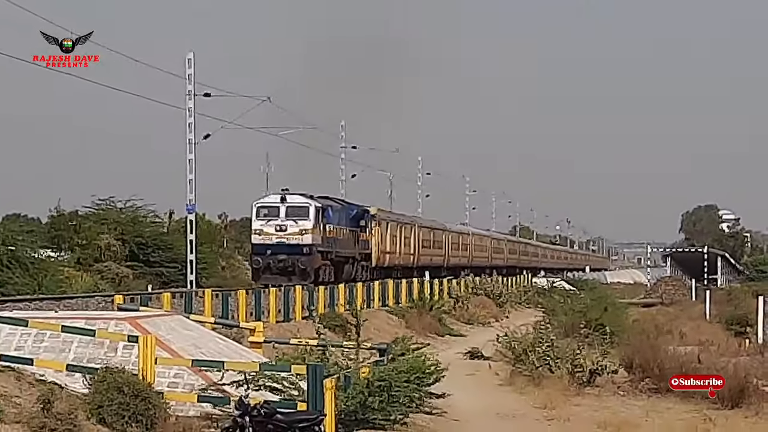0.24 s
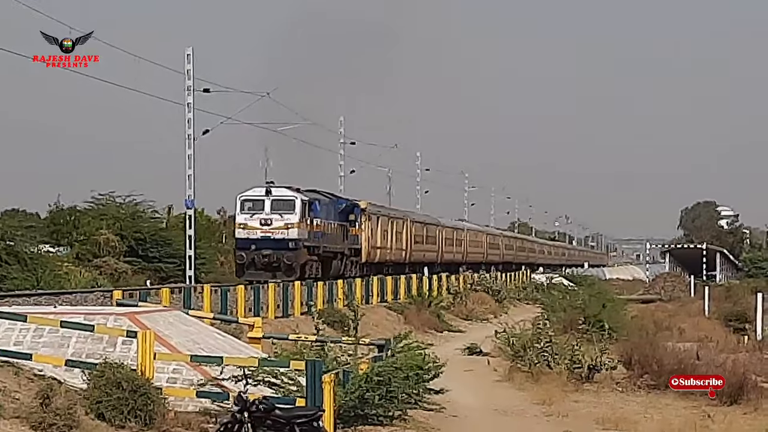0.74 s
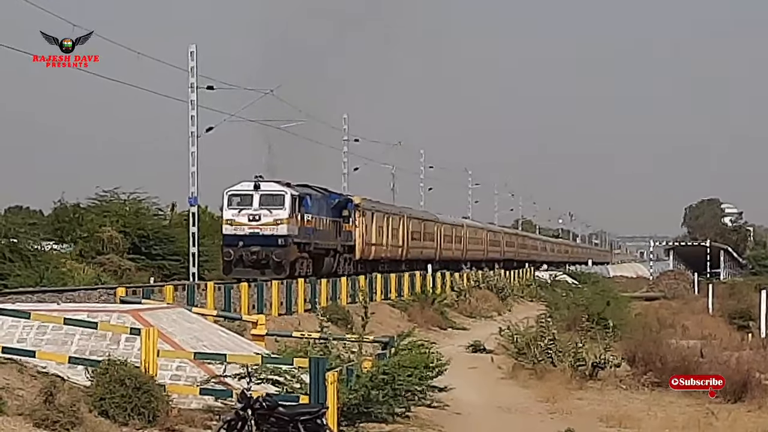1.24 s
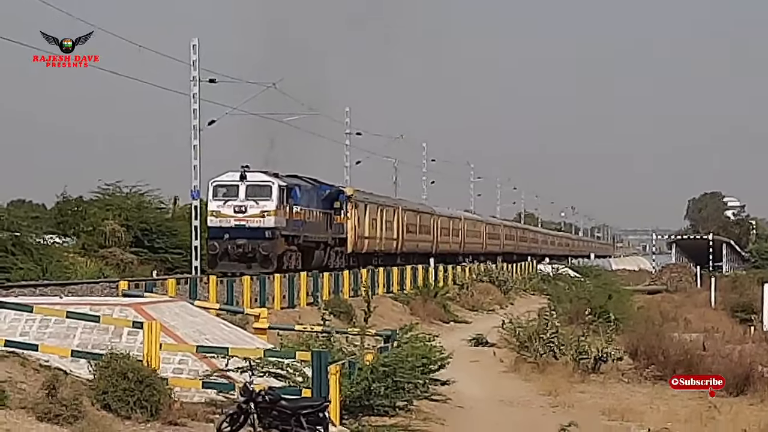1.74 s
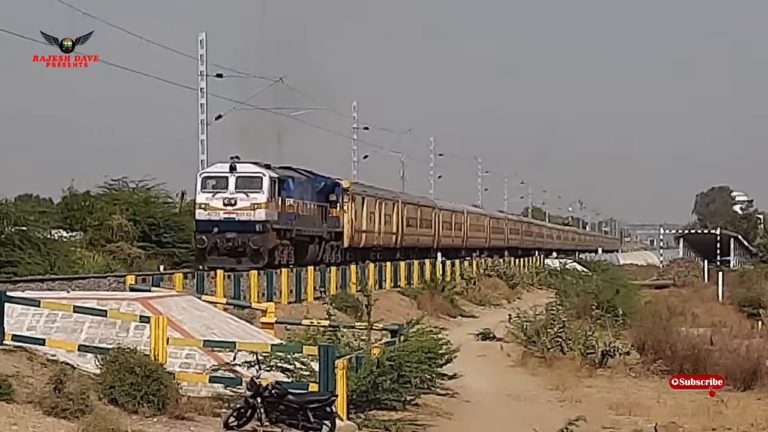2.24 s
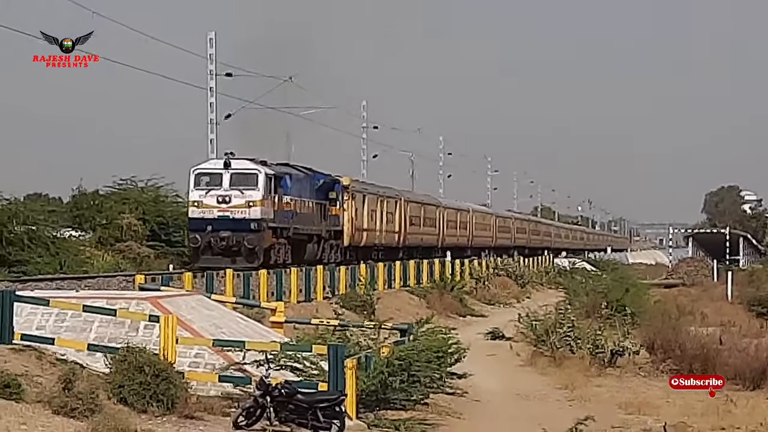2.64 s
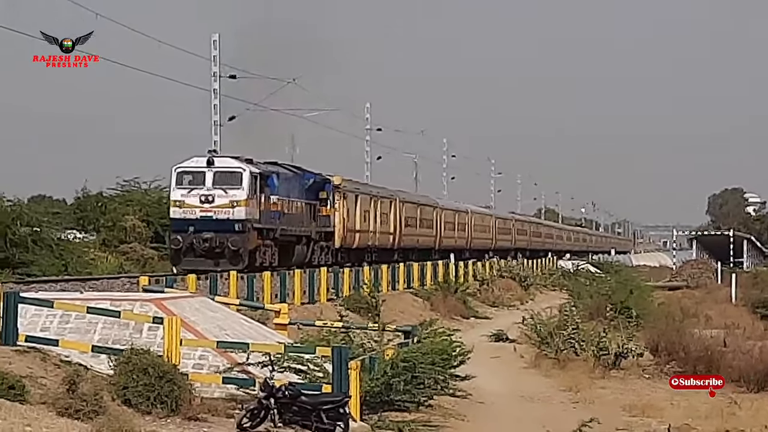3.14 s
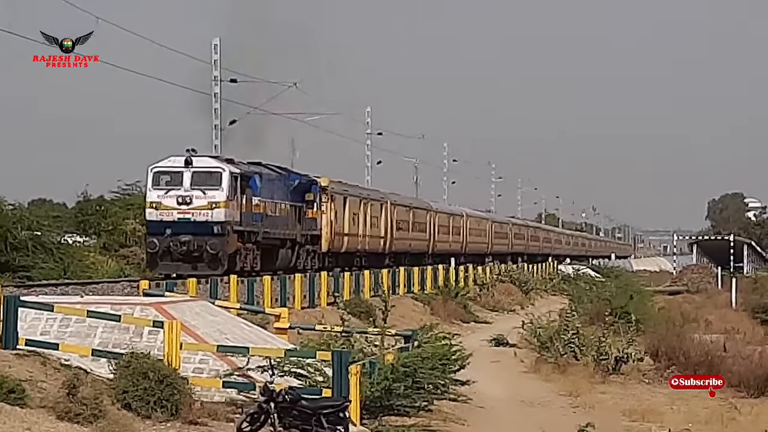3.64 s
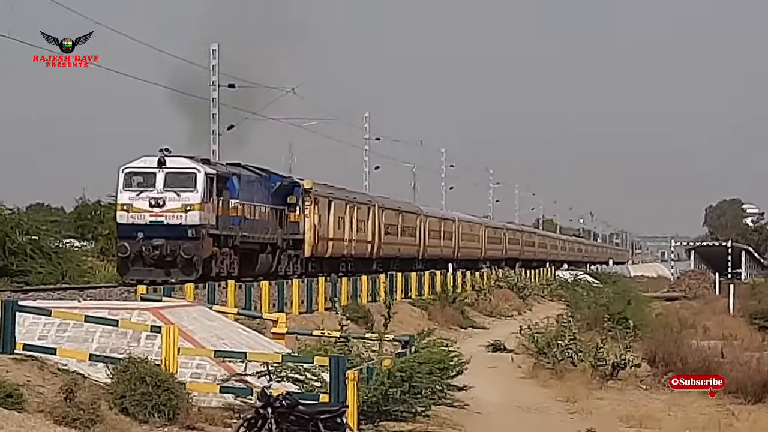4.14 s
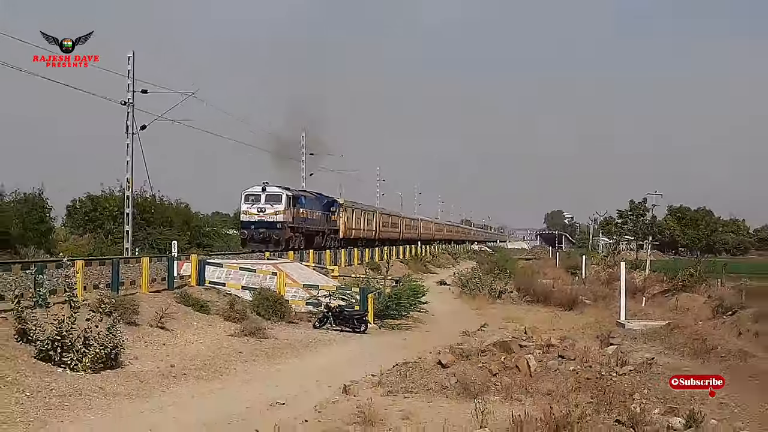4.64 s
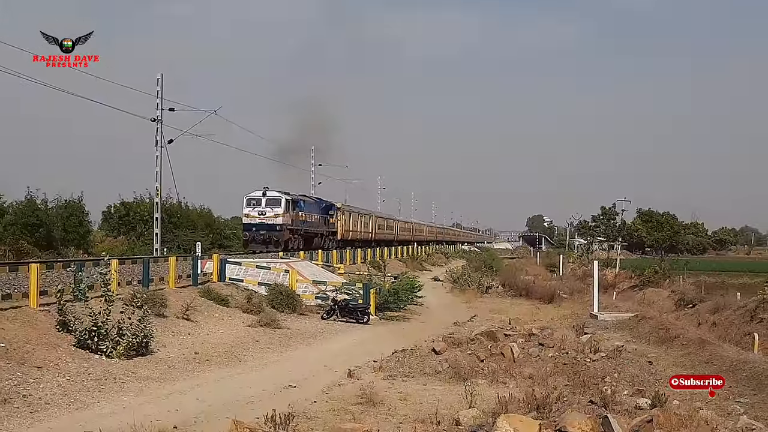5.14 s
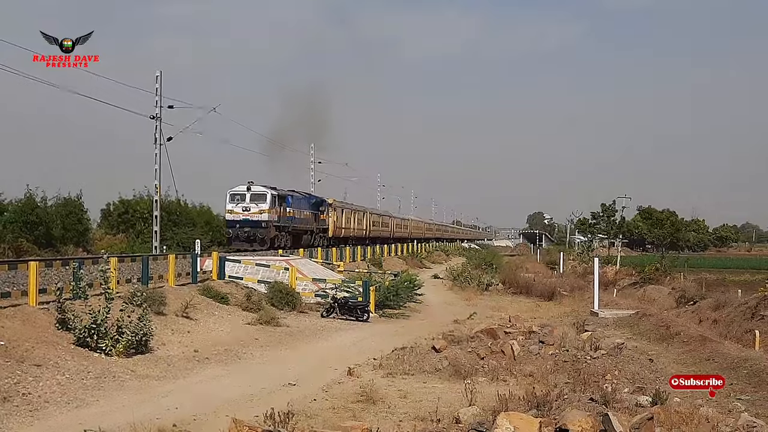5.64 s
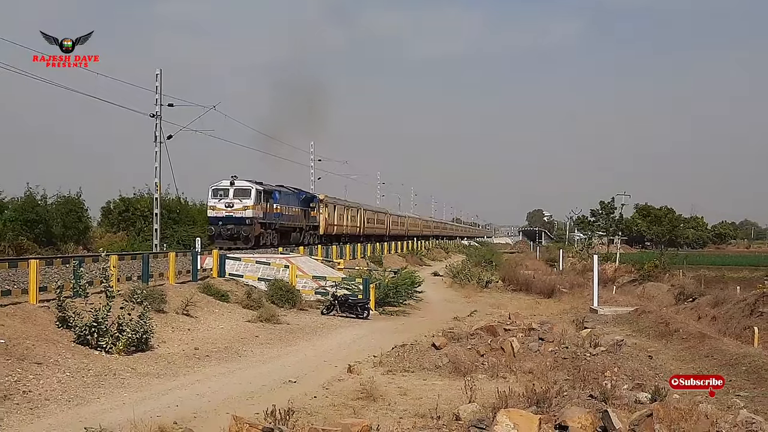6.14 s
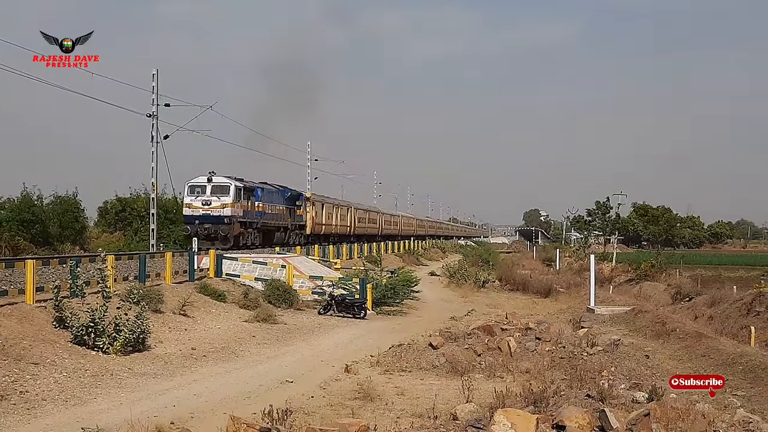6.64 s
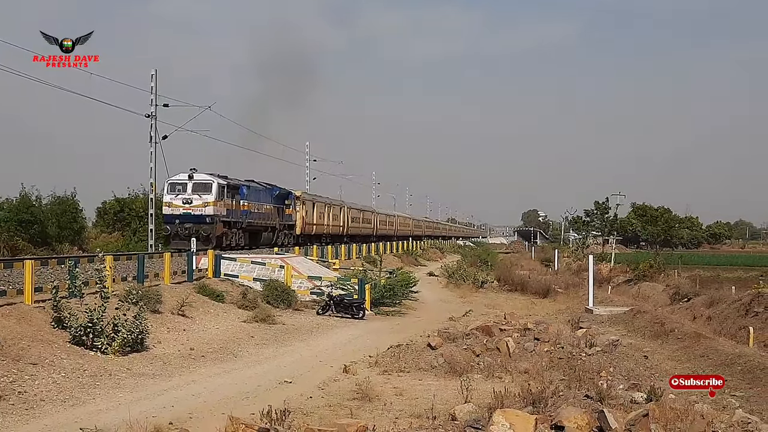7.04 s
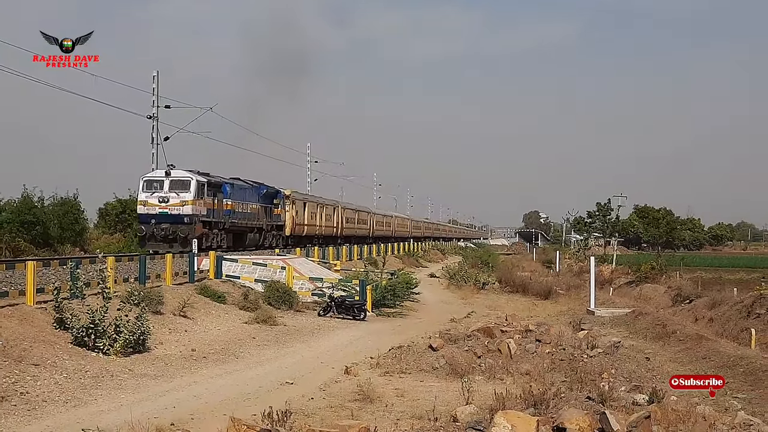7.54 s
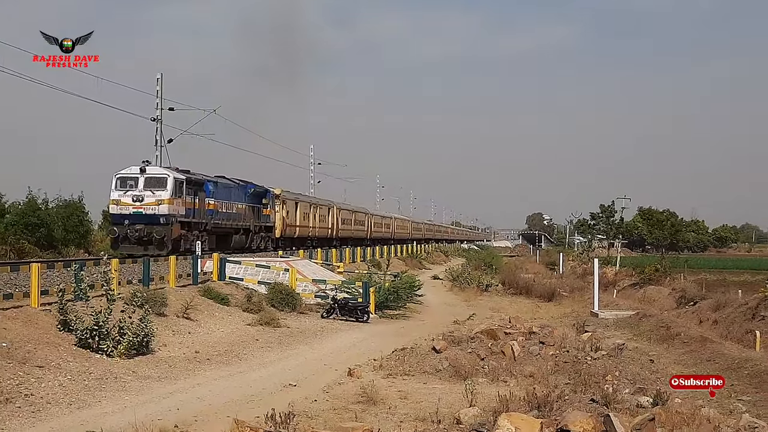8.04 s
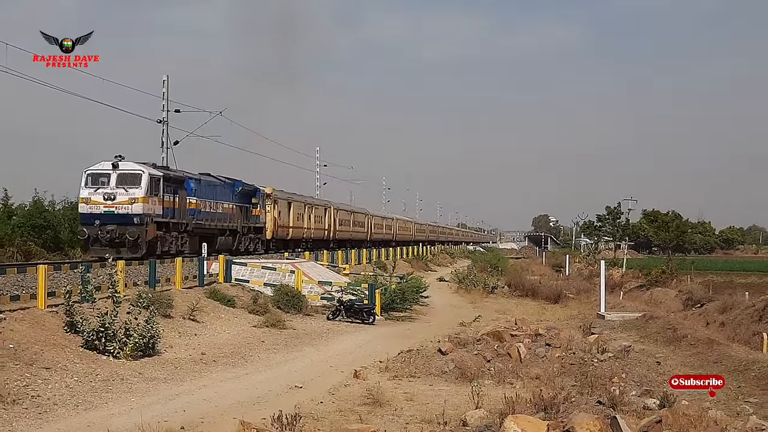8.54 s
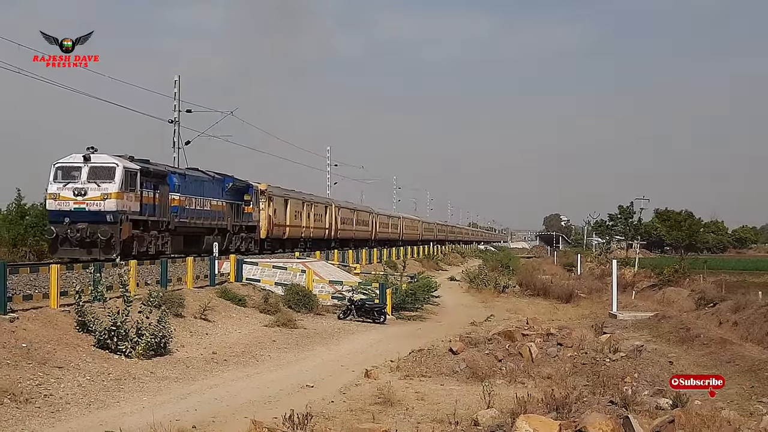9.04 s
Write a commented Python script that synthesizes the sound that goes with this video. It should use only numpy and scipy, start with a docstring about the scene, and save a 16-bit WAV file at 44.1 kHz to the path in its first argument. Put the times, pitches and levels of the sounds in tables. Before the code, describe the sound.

A diesel passenger train approaches in open country, heard from beside the track. From the start its low, throbbing engine drone swells and fades over a soft roar of wheels. Wind rumbles on the microphone, strongest between about 2 and 5 seconds, with scattered short thumps up to 5 seconds. Near 0.4 seconds a very faint, high insect buzz passes briefly on the left.

From about 3.5 to 5 seconds the engine revs up, rising modestly in pitch, then keeps creeping higher. A thin gear whine stands out near 4.4 and 6.4 seconds. The drone dips around 5 seconds and returns fuller by 6. The wind drops after 7 seconds, while wheel noise, fan whine and a high turbocharger hiss build. Deep engine rumble rises as the locomotive draws close at the end, just past 9 seconds.

```python
"""Open trackside, two microphone ports in the wind. A diesel locomotive nears and notches up: its unequal
cylinders make the exhaust throb once a crank turn, gears and fans sing over the roar of engine and
wheels, and the turbocharger's hiss climbs with speed. Gusts buffet and slap the ports, then drop, and
low engine rumble rises at the end. Early on, an insect buzzes once on the left."""
import sys
import numpy as np
from scipy import signal
from scipy.fft import rfft, irfft, next_fast_len
from scipy.io import wavfile
from scipy.ndimage import uniform_filter1d, map_coordinates

SR = 44100
rng = np.random.default_rng(int(sys.argv[2]) if len(sys.argv) > 2 else 0)


def to_wav(sig):
    """Store sig (one row per channel, or 1-D mono) as 16-bit WAV at the path in sys.argv[1].

    Samples outside -1..1 are clipped; the rate is SR.
    """
    pcm = np.clip(np.atleast_2d(sig), -1, 1) * 32767
    pcm = np.round(pcm).astype(np.int16)
    wavfile.write(sys.argv[1], SR, pcm.T)  # frames by channels


N = 409248
TIME = np.arange(N) / SR
PAN = np.array([[.5], [-.5]])  # splits a left-right value between the ports


def amp(db):
    """Gain of a level in dB."""
    return 10 ** (np.asarray(db) / 20)


def unit(x):
    """x at rms 1."""
    return x / np.sqrt(np.mean(np.abs(x) ** 2) + 1e-20)


def along(points, hz):
    """(Hz, value) points read on a log axis."""
    freqs, values = np.transpose(points)
    return np.interp(np.log(hz + 1), np.log(freqs + 1), values)


def curves(rows, t=TIME):
    """Each column after the time, read at times t."""
    times, *columns = np.transpose(rows)
    return [np.interp(t, times, column) for column in columns]


def wobble(rate):
    """A smooth random curve, rate knots a second."""
    knots = rng.standard_normal(int(N * rate / SR) + 4)
    return map_coordinates(knots, [TIME * rate])


def filtered(x, response):
    """x shaped by the gain response(Hz)."""
    size = next_fast_len(N + SR // 2)
    return irfft(rfft(x, size) * response(np.fft.rfftfreq(size, 1 / SR)), size)[..., :N]


def rush(colour_db, patchy_db):
    """Two unrelated noises of colour_db(Hz, s), steady in level, with random patches."""
    hz, t, spectra = signal.stft(rng.standard_normal((2, N)), SR, nperseg=1024)
    gain = amp(colour_db(hz[:, None], t) + np.zeros(spectra.shape[1:]))
    gain /= np.sqrt(np.mean(gain ** 2, axis=0))
    patches = uniform_filter1d(rng.standard_normal(gain.shape), size=10, axis=0)
    patches = unit(uniform_filter1d(patches, size=6, axis=1))
    _, noise = signal.istft(spectra * gain * amp(patchy_db * patches), SR, nperseg=1024)
    return unit(noise[:, :N])


# engine speed: (time [s], firing rate [Hz])
FIRING_RATE = [(0.0, 103.4), (0.4, 102.95), (3.2, 102.96), (3.6, 103.63), (4.0, 105.67), (4.8, 110.75),
               (5.2, 112.44), (6.0, 113.08), (7.2, 115.5), (7.6, 115.88), (9.28, 116.2)]
def crank():
    """Crank angle in radians; eight firing pulses a turn."""
    return 2 * np.pi * np.cumsum(curves(FIRING_RATE)[0]) / SR / 8


def notch():
    """Throttle: 0 at the low notch, 1 at the high."""
    return np.clip((curves(FIRING_RATE)[0] - 108) / (113.5 - 108), 0, 1)


# exhaust tones: (order [per turn], low-notch level [dB], high-notch level [dB])
EXHAUST_ORDERS = [(3, -31.5, -49), (4, -16, -16.5), (5, -19, -20.5), (6, -16, -14.5), (7, -11, -13.5),
                  (8, 2, 2), (9, -4.5, -7), (10, -12, -11.5), (11, -26, -35), (12, -14.5, -26.5),
                  (13, -22, -22.5), (14, -28.5, -24), (16, -22.5, -30.5)]
# unsteady exhaust flow: (frequency [Hz], level [dB])
FLOW_COLOUR = [(25, -19.5), (50, 12.5), (110, 11.5), (170, 5), (300, -36.5), (1500, -120)]
# the whole exhaust from the trackside: (time [s], gain [dB])
EXHAUST_GAIN = [(0, -23), (.33, -25), (.45, -18), (.62, -24), (1.05, -20.5), (1.45, -24), (1.9, -19),
                (2.12, -25), (2.25, -17), (2.45, -25.5), (2.7, -17), (3.15, -21.5), (3.3, -16), (3.6, -17),
                (4.22, -16.5), (4.65, -20.5), (5.1, -30), (5.55, -27), (5.75, -20), (6.0, -21.5),
                (6.2, -18.5), (6.75, -15.5), (8.3, -16.5), (9.28, -17.5)]
def exhaust():
    """Unequal cylinders put orders beside the firing order, so the drone throbs once a turn."""
    angle, high = crank(), notch()
    throb_angle = 2.4 - 3.58 * high  # the throb falls at another point of the turn in the second half
    closing = np.clip((TIME - 7.2) / 2.3, 0, 1)
    drone = np.zeros(N)
    for order, low_db, high_db in EXHAUST_ORDERS:
        opposed = 3.7 * (order % 4 == 2)  # the two banks nearly oppose each other in these orders
        deep_db = 8.7 * closing * (order < 5)  # the deepest orders come up as the engine draws level
        drift = 0.079 * abs(order - 8) * wobble(2.8)
        phase = order * angle + (order - 8) * throb_angle + opposed + drift
        drone += amp(low_db + high * (high_db - low_db) + deep_db + wobble(4.6)) * np.cos(phase)
    flow = amp(-15.5 - 4.2 * high) * rush(lambda hz, t: along(FLOW_COLOUR, hz), patchy_db=1.0)[0]
    return amp(curves(EXHAUST_GAIN)[0]) * (np.sqrt(2) * drone + flow)


# two gear meshes: (time [s], lower pitch [Hz], lower level [dB], upper level [dB])
GEAR_MESHES = [(0, 1390, -63, -57), (3.3, 1398, -55.5, -53), (4.1, 1461, -44.5, -43),
               (4.8, 1506, -50.5, -49), (5.8, 1532, -55, -67), (6.3, 1570, -47, -44),
               (7.3, 1597, -45, -43.5), (8.3, 1599, -36, -39.5), (9.28, 1604, -39, -44)]
# the lower mesh sings out: (time [s], half length [s], rise [dB])
MESH_FLARES = [(4.435, 0.14, 11), (6.4, 0.19, 13)]
# fans and blowers: (order [per turn], level [dB], entry [s], full level at [s], exit [s])
FAN_TONES = [(14.6, -34, 7.3, 7.9, 9.6), (23, -41, 7.6, 8.6, 9.8), (33.4, -46, 6.8, 7.4, 9.8),
             (42.5, -41, 5.1, 5.9, 9.8), (48.6, -38, 4.4, 7.3, 9.8), (52, -49, 0, .3, 3.6),
             (60, -46, 0, .3, 3.6), (79.1, -48, 7, 8, 9.8)]
def gears_and_fans():
    """Meshing teeth and crank-driven blades sing higher as the engine speeds up."""
    mesh_hz, lower_db, upper_db = curves(GEAR_MESHES)
    angle = crank()
    lower_db += sum(db * np.exp(-((TIME - s) / half) ** 4) for s, half, db in MESH_FLARES)
    mesh_phase = 2 * np.pi * np.cumsum(mesh_hz) / SR
    tones = amp(lower_db + 2.5 * wobble(5.1)) * np.sin(mesh_phase + 0.42 * wobble(12))
    tones += amp(upper_db + 1.5 * wobble(8)) * np.sin(113 * angle + .4 * wobble(12))
    for order, db, start, full, end in FAN_TONES:
        fade = np.clip((TIME - start) / (full - start), 0, 1) * np.clip((end - TIME) / 0.57, 0, 1)
        tones += fade * amp(db + 2.5 * wobble(16)) * np.sin(order * angle + .9 * wobble(18))
    return np.sqrt(2) * tones


def approach(far, near, patchy_db):
    """Noise that turns from its far colour to its near one between 4.8 and 6.5 s."""
    def colour_db(hz, t):
        nearness = np.clip((t - 4.8) / 1.7, 0, 1)
        return along(far, hz) * (1 - nearness) + along(near, hz) * nearness
    return rush(colour_db, patchy_db)


# colours of the roar, far down the line and near the microphone: (frequency [Hz], level [dB])
FAR_BODY = [(180, -22.5), (300, -5), (522, -12), (649, -5), (728, -9), (790, -0.5), (852, -9), (981, -11),
            (1100, -21.5), (1430, -48.5), (2420, -120)]
NEAR_BODY = [(94, -37.5), (160, -13), (172, -26), (210, -14.5), (238, -9), (347, -6.5), (545, -19),
             (601, -9.5), (700, -6.5), (1010, -15.5), (1100, -29), (1430, -52), (2420, -120)]
FAR_CLATTER = [(620, -39), (1050, -11), (1260, -7), (1400, 1), (1530, -7), (1670, -3.5), (2200, -13),
               (2700, -20), (3510, -25.5), (5940, -120)]
NEAR_CLATTER = [(620, -46), (1050, -16), (1180, -3.5), (1490, -3.5), (1600, -2.5), (1750, -10),
                (1980, -2.5), (2700, -27.5), (3510, -57), (5940, -120)]
FAR_MID_HISS = [(1470, -41.5), (2500, -6.5), (2930, -4), (3160, -13.5), (3390, -6), (3540, -1.5),
                (3690, -4), (3880, -12), (4440, -9.5), (4600, -17), (4760, -17), (5300, -14), (6890, -41.5),
                (11700, -120)]
NEAR_MID_HISS = [(1470, -35), (2500, -2), (3120, -9.5), (3380, 0), (3560, 1), (4040, -10), (4440, -8.5),
                 (5300, -26), (6890, -52.5), (11700, -120)]
FAR_HISS = [(2940, -41.5), (5000, -10.5), (6100, -5.5), (7060, -3.5), (7700, -5.5), (8690, -2),
            (9870, -21.5), (10500, -14), (13600, -57), (22000, -120)]
NEAR_HISS = [(2940, -49), (5000, -14), (5350, -13.5), (6840, -3), (7870, -11), (8930, -7.5), (9360, -17),
             (9840, -25.5), (10500, -31), (13600, -60.5), (22000, -120)]
# the engine body drawing near: (time [s], level [dB])
BODY_LEVEL = [(0, -36), (4.8, -34), (5.9, -32.5), (6.3, -30), (6.85, -33), (7.4, -29.5), (8.3, -29),
              (9.28, -26)]
# what the moving air lets through: (time [s], clatter [dB], upper-mid hiss [dB], air hiss [dB])
ROAR_LEVELS = [(0.0, -40, -52, -56), (0.02, -40, -50, -60), (0.41, -39, -52, -57.5),
               (1.32, -35.5, -43.5, -54), (1.68, -38, -49, -57.5), (2.02, -39.5, -47.5, -50),
               (2.35, -40.5, -52.5, -57), (2.69, -37, -47.5, -56), (3.2, -39, -51, -57.5),
               (3.88, -37.5, -47.5, -51), (4.06, -32, -43, -50.5), (4.16, -34, -43.5, -47.5),
               (4.42, -33.5, -48.5, -52.5), (4.88, -40.5, -51, -57), (5.71, -38.5, -51, -55),
               (6.18, -31.5, -40, -50), (6.41, -33.5, -40, -46.5), (6.59, -33.5, -39.5, -48),
               (6.8, -34.5, -41, -47.5), (7.08, -33, -44.5, -53), (7.44, -32.5, -42.5, -46.5),
               (7.62, -33, -42.5, -51.5), (8.32, -30.5, -38, -42), (9.28, -29, -37, -43)]
def roar():
    """Engine body, clatter, upper-mid hiss near 3.5 kHz and air hiss, fluttering in the moving air."""
    clatter_db, mid_db, hiss_db = curves(ROAR_LEVELS)
    body_db, = curves(BODY_LEVEL)
    beat, air = np.cos(crank() - .8), wobble(6)
    body = amp(body_db + 0.56 * beat + 0.52 * air) * approach(FAR_BODY, NEAR_BODY, 1.14)
    clatter = amp(clatter_db + 0.38 * beat + .9 * air) * approach(FAR_CLATTER, NEAR_CLATTER, 0.43)
    puffs_db = 0.44 * np.cos(8 * crank()) + 1.01 * air  # each firing puffs the treble
    mid_hiss = amp(mid_db + puffs_db + 0.57 * wobble(25)) * approach(FAR_MID_HISS, NEAR_MID_HISS, 1.3)
    hiss = amp(hiss_db + puffs_db + 0.42 * wobble(25)) * approach(FAR_HISS, NEAR_HISS, 1.6)
    return filtered(body + clatter + mid_hiss + hiss, lambda hz: hz < 11400)


# blade hiss at full speed: (frequency [Hz], level [dB])
TURBO_COLOUR = [(9500, -90), (10600, -24), (11300, -17), (11900, -5), (12500, 0), (13050, -4), (13250, -28),
                (13450, -90)]
# turbocharger from the trackside: (time [s], level [dB])
TURBO_LEVEL = [(0, -74), (.8, -71), (1.4, -60), (1.8, -71), (2.0, -63), (2.25, -74), (2.8, -64.5),
               (3.4, -68), (4.2, -60), (5.0, -68.5), (6.4, -58), (7.4, -51), (7.8, -53), (8.4, -41.5),
               (8.65, -46), (9.28, -44)]
def turbo(full_speed_hz=116):
    """The geared turbocharger hisses in a band that slides with the crank speed."""
    def colour_db(hz, t):
        return along(TURBO_COLOUR, hz * full_speed_hz / curves(FIRING_RATE, t)[0])
    band = rush(colour_db, patchy_db=3.0)
    return amp(curves(TURBO_LEVEL)[0] + 0.77 * wobble(9) + 0.88 * wobble(36)) * band


# wind on the ports, then low engine rumble at the end: (time [s], level [dB], left-right [dB])
RUMBLE_LEVEL = [(0, -26, -0.5), (.5, -24, 0), (1.1, -27.5, 3.5), (1.5, -23.5, -2.5), (2.1, -18.5, 2),
                (2.9, -25, 3), (3.4, -17, -1), (4.2, -20, -1.5), (4.6, -21, -1.5), (5.0, -20.5, -5.5),
                (5.4, -27.5, -8), (6.0, -22, 0.5), (6.8, -25.5, 7), (7.5, -33, -8), (8.2, -37, -1.5),
                (9.28, -25.5, -2)]
def rumble_db():
    """Level at each port of the wind and, at the end, the engine rumble."""
    level_db, pan_db = curves(RUMBLE_LEVEL)
    return level_db + PAN * pan_db


# rumble at the ports: (frequency [Hz], level [dB])
RUMBLE_COLOUR = [(20, -41), (40, -10), (60, -1), (110, -2), (170, -4.5), (300, -15), (500, -26), (900, -96),
                 (3000, -120)]
def wind_and_rumble():
    """Lumpy turbulence, then engine rumble; only the slowest eddies, the deep bass, cover both ports."""
    eddies = 0.5 * np.array([wobble(10), wobble(11)]) + 0.92 * np.array([wobble(35), wobble(35)])
    lumps = amp(7.8 * np.tanh(eddies / 1.54))  # gusts swell up to a limit
    share = lambda hz: 0.73 / (1 + (hz / 120) ** 2)
    own = filtered(lumps * rng.standard_normal((2, N)), lambda hz: np.sqrt(1 - share(hz)))
    both = filtered(lumps.mean(axis=0) * rng.standard_normal(N), lambda hz: np.sqrt(share(hz)))
    return amp(rumble_db()) * unit(filtered(own + both, lambda hz: amp(along(RUMBLE_COLOUR, hz))))


def choke():
    """Bass gain at each port: a strong gust covers it for a moment."""
    gusty = np.clip((rumble_db() + 32.5) / 17.0, 0, 1)
    cover = np.clip(np.array([wobble(34), wobble(34)]) + 0.7 * wobble(28) - .45, 0, 1.6)
    return amp(-11 * gusty * cover)


# insect wings: (frequency [Hz], level [dB])
WING_COLOUR = [(10500, -120), (11500, -50), (12200, 0), (13200, -2.5), (14300, -5), (15100, -26)]
def insect(onset_s=.356, hold_s=0.33, attack_db_per_s=2500, fade_db_per_s=144):
    """One short, high buzz of wings, left of the microphone."""
    t = TIME - onset_s
    level_db = -61 + attack_db_per_s * np.minimum(t, 0) - fade_db_per_s * np.maximum(t - hold_s, 0)
    buzz = rush(lambda hz, t: along(WING_COLOUR, hz), patchy_db=6)
    return amp(level_db + 9 * PAN) * buzz


# slaps of wind on the ports: (time [s], gain [dB], left-right [dB])
WIND_SLAPS = [(0.48, -9, -9), (1.684, -14, -16), (1.774, -11, 2), (1.858, -5, -13.5), (2.698, -7.5, 4),
              (3.151, -14, -1), (3.359, -7, 1), (3.601, -15, -1), (4.373, -11, -2), (5.04, -10.5, 3.5)]
def wind_slaps():
    """Each slap swings the microphone's membrane once or twice."""
    out, t = np.zeros((2, N + SR)), np.arange(SR // 20) / SR
    push = np.sin(2 * np.pi * 190 * t) * amp(-60 * t / 0.015)
    push += 0.19 * np.sin(2 * np.pi * 620 * t) * amp(-60 * t / 0.0061)  # a short flap on top
    push *= 1 - np.exp(-t / 0.00035)
    for s, db, pan_db in WIND_SLAPS:
        start = round(s * SR)
        out[:, start:start + len(t)] += amp(db + PAN * pan_db) * push
    return out[:, :N]


# how alike the two ports hear the train: (frequency [Hz], likeness [0-1])
PORT_LIKENESS = [(100, 1), (620, .96), (1340, .94), (2000, .9), (2700, .85), (3500, .88), (4300, .7),
                 (6900, .7), (12000, .7)]
# phase between the ports: (frequency [Hz], left lead [rad])
PORT_LEAD = [(100, .05), (700, .15), (1400, .5), (2050, .9), (2700, .3), (3500, -.3), (4300, -1.1),
             (4900, -.5), (5500, 2.2), (6900, .2), (8400, 2.5), (12000, .8)]
# balance of the ports: (frequency [Hz], left-right [dB])
PORT_BALANCE = [(60, 0.5), (150, 3), (700, 1.6), (1400, 0.7), (2050, 4), (2700, 5), (3500, -0.5),
                (4300, -2.5), (5500, 5), (6900, 1.8), (8400, -2.5), (12000, 3.5)]
def ports(direct, scattered):
    """Distant sound at the microphone: the ports share the direct part; scatter sets them apart."""
    spread = lambda hz: np.arccos(np.clip(along(PORT_LIKENESS, hz), -1, 1)) / 2
    mid = filtered(direct, lambda hz: np.cos(spread(hz)))
    side = filtered(scattered, lambda hz: np.sin(spread(hz)))
    response = lambda hz: amp(PAN * along(PORT_BALANCE, hz)) * np.exp(1j * PAN * along(PORT_LEAD, hz))
    return filtered(np.array([mid + side, mid - side]), response)


def scene():
    """The train from the trackside, with wind and an insect."""
    direct, scattered = roar() + turbo()
    lean = amp(-1.7 * (1 - notch()) * PAN)  # the exhaust sits further right until the engine speeds up
    bass = choke() * (lean * ports(exhaust(), np.zeros(N)) + wind_and_rumble())
    return ports(direct + gears_and_fans(), scattered) + bass + wind_slaps() + insect()


# the whole level dips briefly: (time [s], half length [s], gain [dB])
LEVEL_DIPS = [(0.357, 0.023, -5.5), (1.533, 0.031, -4)]
def record(dry):
    """Two brief dips in level; the recorder keeps nothing above its band limit."""
    dips_db = sum(db * np.exp(-((TIME - s) / half) ** 2) for s, half, db in LEVEL_DIPS)
    return filtered(dry * amp(dips_db), lambda hz: hz < 15100)


dry = scene()
out = record(dry)
to_wav(out)
```